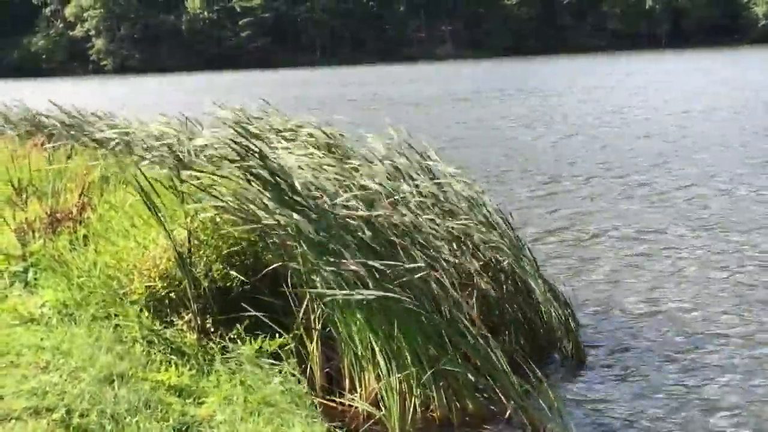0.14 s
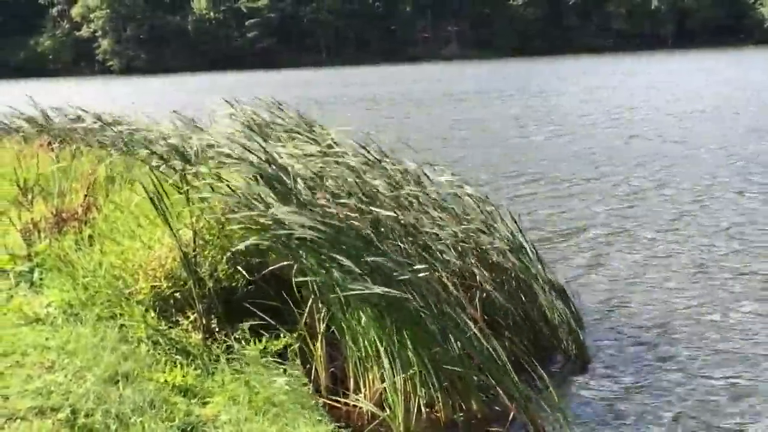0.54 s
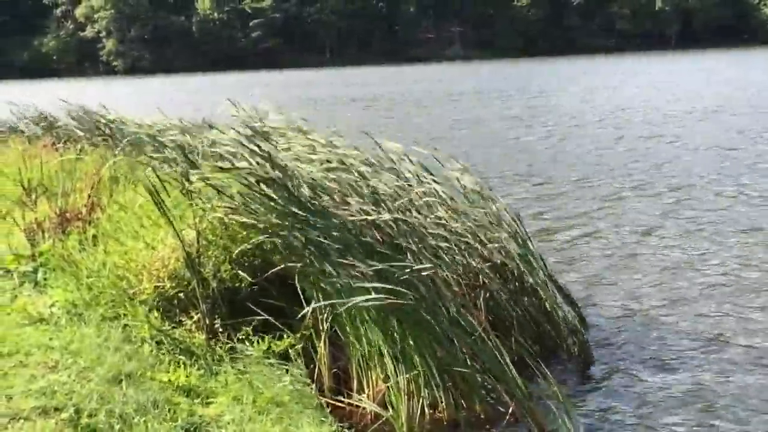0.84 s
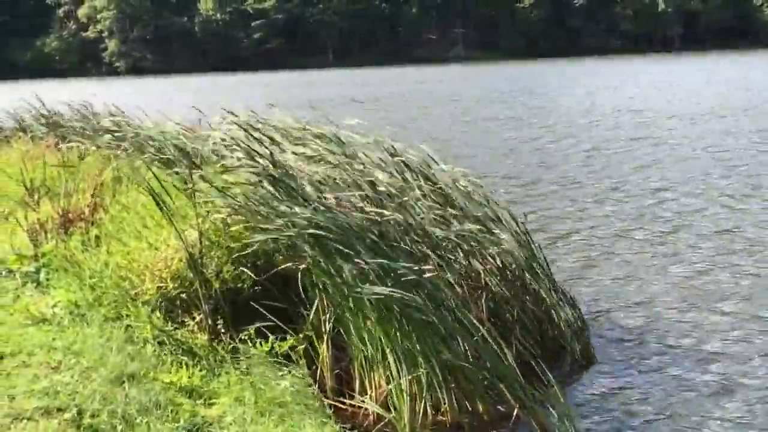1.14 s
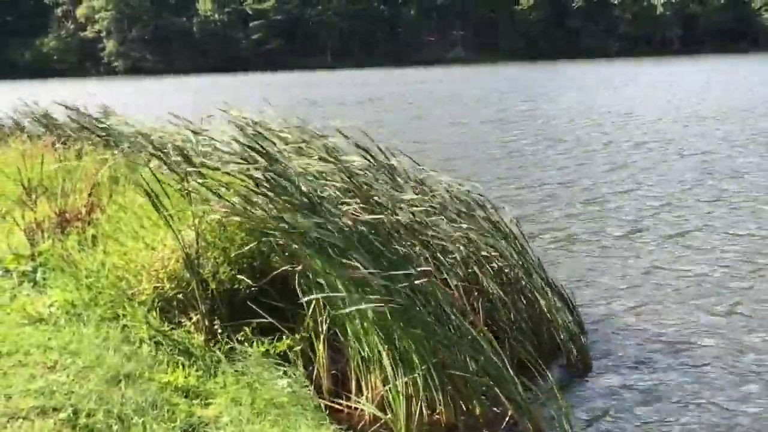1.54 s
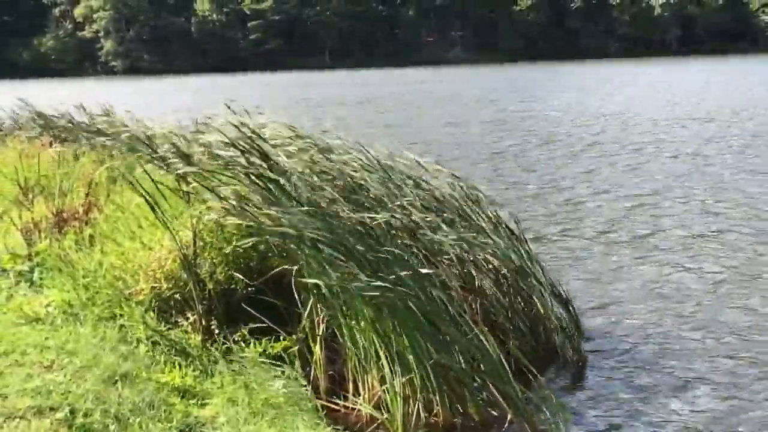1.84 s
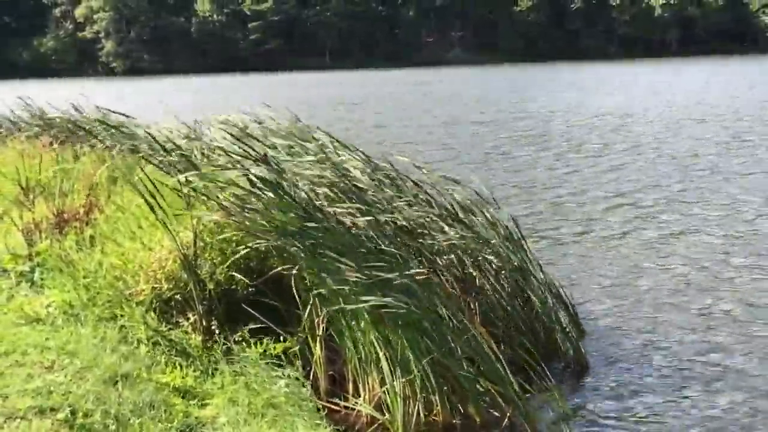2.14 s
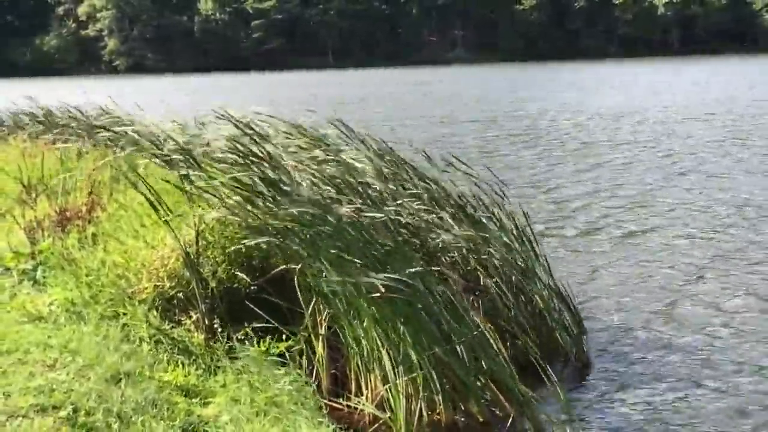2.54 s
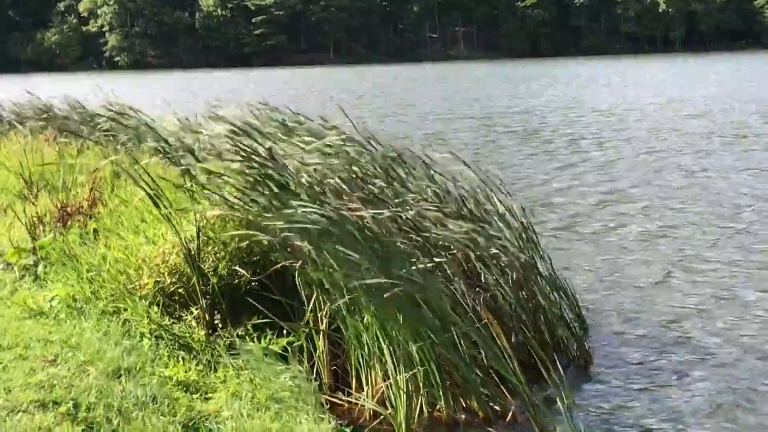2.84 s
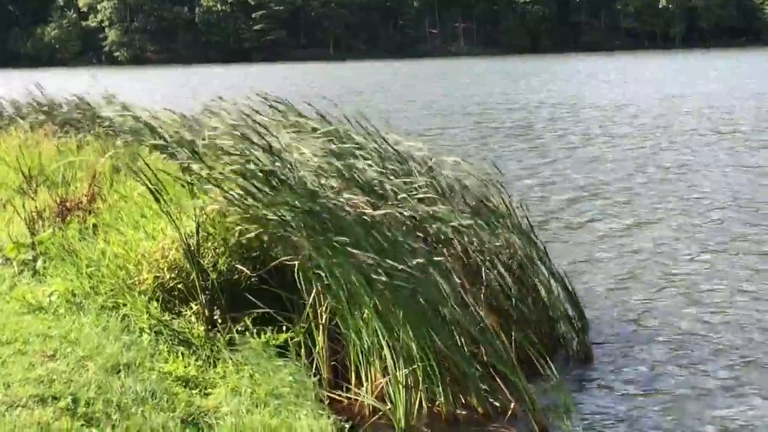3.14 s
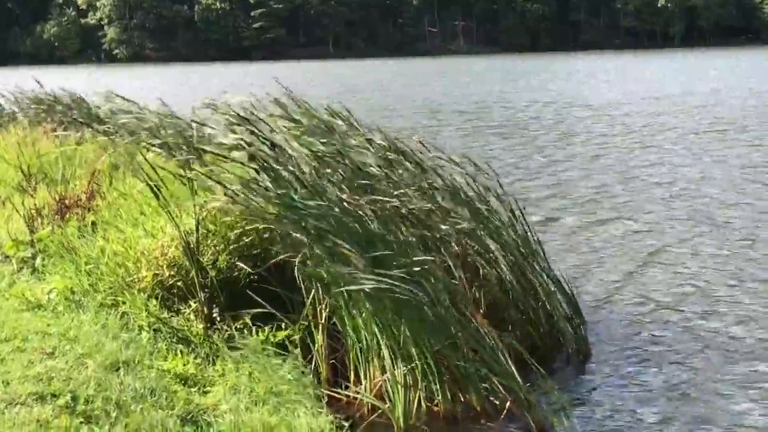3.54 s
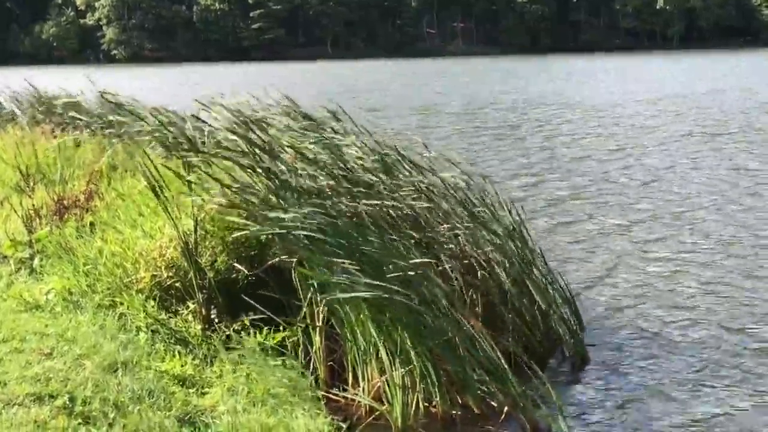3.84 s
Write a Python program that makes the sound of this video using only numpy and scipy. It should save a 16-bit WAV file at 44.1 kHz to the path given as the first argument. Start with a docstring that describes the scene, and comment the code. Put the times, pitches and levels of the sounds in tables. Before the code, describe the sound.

Wind blows softly through lakeside reeds, with low gusts bumping against the microphone.

```python
"""Wind in lakeside reeds.

Reeds and wavelets make an even wash, with the fine rustle of touching leaves and a few bubble plips.
Wind rumbles on the microphone, easing off, and single eddies bump against it.
An insect, probably a meadow katydid, rubs its wings in a very high buzz, stops, ticks, faintly resumes."""
import sys
import numpy as np
from scipy import signal
from scipy.fft import rfft, irfft
from scipy.io import wavfile
from scipy.ndimage import uniform_filter1d

SR = 44100
rng = np.random.default_rng(int(sys.argv[2]) if len(sys.argv) > 2 else 0)


def file_out(sig):
    """Save sig as 16-bit WAV at sys.argv[1]."""
    # one column per channel
    cols = np.atleast_2d(sig).T
    # limit, then scale
    lim = np.clip(cols, -1, 1)
    pcm = np.round(lim * 32767).astype(np.int16)
    wavfile.write(sys.argv[1], SR, pcm)


N = 176400


# reed and wavelet spectrum (frequency [Hz], density [dB])
WASH_SPECTRUM = [(100, -23), (350, -1.5), (600, 1.5), (1050, 0.5), (1600, -2.5), (2050, -6), (3300, -7.5),
                 (4550, -11), (4900, -15), (5300, -13), (6700, -15), (7700, -19.5), (8500, -17),
                 (9500, -17.5), (10500, -22.5), (12000, -20), (13500, -20.5), (16000, -23)]
WASH_DB, SWELL_DB, FLICKER_DB = -59, 0.43, 0.78

def wash(bands=12):
    """Reeds and wavelets: noise bands that swell together and flicker separately."""
    spectrum = rfft(colour(noise(), WASH_SPECTRUM))
    swell_db = SWELL_DB * walk(2.6)
    band_position = np.interp(np.log(freqs()), np.log([300, 15000]), [0, bands - 1])
    out = np.zeros(N)
    for k in range(bands):
        band = irfft(spectrum * np.maximum(1 - abs(band_position - k), 0), N)
        out += band * undb(swell_db + FLICKER_DB * walk(18))
    return undb(WASH_DB) * out


# leaf scratch spectrum (frequency [Hz], density [dB])
LEAF_SPECTRUM = [(700, -12), (1400, 1), (3500, -14), (6500, -9.5), (11000, -26), (16000, -22)]
LEAF_DB, TOUCHES_PER_S, LEAF_SPREAD_DB, LEAF_DECAY_S = -72.5, 400, 3, 0.0023

def leaves():
    """Blades brush each other: many tiny scratches of uneven size."""
    touches = rng.random(N) < TOUCHES_PER_S / SR
    sizes = undb(LEAF_SPREAD_DB * np.minimum(rng.exponential(size=N), 4))
    envelope = signal.lfilter([1], [1, -np.exp(-1 / (LEAF_DECAY_S * SR))], touches * sizes)
    return undb(LEAF_DB) * colour(envelope * noise(), LEAF_SPECTRUM)


# reed sway (time [s], gain [dB])
REED_SWAY = [(0, .5), (.35, 1.5), (.65, -1), (1.2, 0), (1.7, 0.54), (2.5, 0), (3.2, 0.5), (4, 1)]

def reeds():
    """Wash and rustle rise and fall as the reeds sway."""
    return (wash() + leaves()) * undb(curve(REED_SWAY))


# wind pressure on the microphone (time [s], level [dB])
WIND_LEVEL = [(0, -36), (.1, -36), (.28, -38), (.45, -34.5), (.55, -35.5), (.6, -39), (.66, -29.5),
              (.71, -39), (.9, -41), (1.04, -36.5), (1.13, -36), (1.2, -41), (1.28, -36.5), (1.42, -33),
              (1.48, -43.5), (1.55, -41), (1.64, -47.5), (1.73, -40), (1.85, -46), (2.03, -43), (2.11, -53),
              (2.22, -39.5), (2.32, -40), (2.4, -40), (2.49, -45), (2.56, -46.5), (2.72, -47),
              (2.86, -46.5), (3.03, -43), (3.11, -50), (3.2, -48.5), (3.38, -47.5), (3.54, -46),
              (3.63, -50.5), (3.76, -47.5), (3.9, -43.5), (3.97, -41.5)]
# air stream spectrum (frequency [Hz], density [dB])
RUMBLE_SPECTRUM = [(15, -31), (30, -5), (45, -2.5), (62, 2), (85, -3.5), (125, -10.5), (180, -16),
                   (260, -27), (400, -48), (800, -82), (2000, -85)]
# fine turbulence spectrum (frequency [Hz], density [dB])
FLUTTER_SPECTRUM = [(60, -30), (140, 5.5), (230, -0.5), (330, -7.5), (430, -15.5), (530, -17.5),
                    (720, -20.5), (1500, -57), (3000, -90)]
FLUTTER_DB, FLUTTER_DB_PER_DB, BRISK_WIND_DB = -49.5, 1.52, -34
RUMBLE_SPREAD_DB, FLUTTER_SPREAD_DB = 2.5, 5

def buffeting():
    """Air streams over the microphone: low rumble, plus patchy flutter that grows faster than the wind."""
    wind_db = curve(WIND_LEVEL)
    rumble = steady(colour(noise(), RUMBLE_SPECTRUM)) * undb(wind_db + RUMBLE_SPREAD_DB * walk(35))
    flutter = steady(colour(noise(), FLUTTER_SPECTRUM)) * undb(FLUTTER_SPREAD_DB * walk(60))
    flutter_db = FLUTTER_DB + FLUTTER_DB_PER_DB * (wind_db - BRISK_WIND_DB)
    return rumble + unit(flutter) * undb(flutter_db)


# eddy strikes (time [s], pulse peak [dB], pulse centre [Hz], wake [dB], wake top [Hz], wake sigma [s])
EDDY_STRIKES = [(.438, -27, 83.5, -36.5, 231, 0.0088), (0.512, -23, 78.5, -38, 230, 0.011),
                (.535, -27, 65, -45, 230, 0.012), (0.6325, -19.5, 433, -31.5, 620, 0.0047),
                (.6367, -15.5, 212, -23, 310, 0.0062), (0.644, -21.5, 104, -30, 330, 0.0073),
                (.661, -21, 69.6, -37.5, 280, 0.011), (0.75, -21, 73.6, -34, 200, 0.014),
                (.797, -22, 84, -37, 285, 0.012), (0.888, -23.5, 70, -35, 241, 0.013),
                (.915, -22.5, 99, -38.5, 296, 0.0052), (0.9326, -22, 264, -32.5, 486, 0.012),
                (0.979, -26, 105, -26.5, 258, .006), (1.001, -19, 60.6, -31, 293, 0.0088),
                (1.101, -26.5, 134, -38, 261, 0.013), (1.134, -28, 64.6, -37, 198, 0.0044),
                (1.216, -32.5, 220, -45, 350, 0.0085), (1.26, -20, 81, -38, 220, 0.014),
                (1.302, -21.5, 64, -37, 237, .012), (1.573, -25, 78, -41.5, 220, 0.014),
                (1.726, -33.5, 113, -44, 227, 0.013), (1.897, -17, 107, -32.5, 343, 0.011),
                (2.260, -19.5, 135, -60, 230, .005), (2.602, -27.5, 98, -46.5, 242, 0.0095),
                (2.748, -31, 126, -45, 320, 0.013), (2.781, -32, 122, -42.5, 290, 0.0072),
                (2.925, -42, 83.6, -52, 240, 0.0084), (3.313, -37.5, 90, -51, 317, 0.0074),
                (3.436, -38.5, 110, -50, 340, 0.0064), (3.826, -36.5, 200, -43.5, 430, 0.0055),
                (3.838, -28, 72, -45.5, 250, 0.0075), (3.857, -28, 85, -40.5, 620, 0.0063)]
WAKE_LOW_HZ, WAKE_LOWPASS_ORDER, WAKE_TILT = 105, 3.24, 0.63

def eddies(t):
    """Each eddy is one smooth swing of pressure inside a short turbulent wake."""
    out, f = np.zeros(N), freqs()
    highpass = 1 / np.hypot(1, (WAKE_LOW_HZ / f) ** 2)
    for at, peak_db, pulse_hz, wake_db, top_hz, sigma_s in EDDY_STRIKES:
        u = (np.pi * pulse_hz * (t - at)) ** 2
        pulse = (1 - 2 * u) * np.exp(-u)
        lowpass = 1 / np.hypot(1, (f / top_hz) ** WAKE_LOWPASS_ORDER)
        turbulence = irfft(rfft(noise()) * f ** -WAKE_TILT * highpass * lowpass, N)
        wake = steady(turbulence, samples=882) * bell(t - at, sigma_s)
        out += undb(peak_db) * pulse + undb(wake_db) * wake
    return out


# microphone port response (frequency [Hz], gain [dB])
PORT_RESPONSE = [(15, -26), (28, -12.5), (42, 0.5), (150, 0), (250, 1), (340, 0.5), (390, -0.5), (428, -5),
                 (470, -1.5), (535, -2.5), (640, -1), (730, -6), (900, -1), (1500, 1)]

def wind(t):
    """The microphone opening colours the buffeting and the eddies."""
    return irfft(rfft(buffeting() + eddies(t)) * gains(PORT_RESPONSE), N)


# wing strokes (time [s], rate [Hz])
WING_RATE = [(0, 36.5), (1, 36.5), (1.3, 36.1), (2.6, 36.1), (3.33, 34.2), (4, 35)]
# buzz envelope (time [s], level [dB])
BUZZ_LEVEL = [(0, -79), (.07, -77), (.12, -68), (.24, -73), (.34, -68), (.66, -74.5), (.97, -67.5),
              (1.3, -75), (1.53, -68), (1.66, -72), (1.88, -69), (2.04, -71), (2.13, -70), (2.4, -70),
              (2.85, -67), (3.1, -66.5), (3.32, -69), (3.36, -89.5), (3.8, -86), (3.9, -77), (4, -80)]
# wing resonances (frequency [Hz], density [dB])
WING_SPECTRUM = [(6000, -47), (9000, -22), (11300, -17), (12300, -4), (13700, -10), (14400, 4), (15300, 5),
                 (16000, -4.5)]
# lone strokes (time [s], envelope peak [dB])
WING_TICKS = [(3.380, -64), (3.494, -72), (3.552, -68)]
FIRST_STROKE_S, STROKE_SIGMA_CYCLES, JITTER_CYCLES = .018, .19, .04
STROKE_SKEW, RETURN_STROKE = 0.28, .22  # slower rise than fall; strength of the wing's way back
STROKE_SCATTER_DB, TICK_SIGMA_S = 1.3, .002

def katydid(t):
    """Each wing stroke drags a file over the scraper, swells and breaks off; lone strokes tick."""
    cycles = np.cumsum(curve(WING_RATE)) / SR - FIRST_STROKE_S * WING_RATE[0][1]
    phase = (cycles + JITTER_CYCLES * walk(25) + .5) % 1 - .5
    sigma = STROKE_SIGMA_CYCLES * (1 - STROKE_SKEW * np.sign(phase))
    strokes = unit(RETURN_STROKE + bell(phase, sigma))
    buzz = strokes * undb(curve(BUZZ_LEVEL) + STROKE_SCATTER_DB * walk(36.1))
    ticks = sum(undb(db) * bell(t - at, TICK_SIGMA_S) for at, db in WING_TICKS)
    return (buzz + ticks) * colour(noise(), WING_SPECTRUM)


# bubbles at the shore (time [s], starting pitch [Hz], peak [dB])
BUBBLES = [(.057, 1470, -52), (.320, 3150, -56), (.528, 1270, -54.5), (1.829, 1910, -55.5),
           (2.920, 1560, -53)]
PLIP_DECAY_S, PLIP_RISE_PER_S = .008, 5.3

def plips(t):
    """Small bubbles ring in breaking wavelets, rising in pitch as they fade."""
    out = np.zeros(N)
    for at, hz, db in BUBBLES:
        age = np.maximum(t - at, 0)
        cycles = hz * age * (1 + PLIP_RISE_PER_S * age / 2)
        out += undb(db) * np.exp(-age / PLIP_DECAY_S) * np.sin(2 * np.pi * cycles)
    return out


def undb(db):
    """Decibels to gain."""
    return 10 ** (np.asarray(db) / 20)


def unit(x):
    """Scale to rms 1."""
    return x / np.sqrt(np.mean(x ** 2))


def bell(x, sigma):
    """Bell curve, peak 1."""
    return np.exp(-.5 * (x / sigma) ** 2)


def curve(rows):
    """Straight lines through (time [s], value) rows."""
    return np.interp(np.arange(N) / SR, *np.array(rows, float).T)


def freqs():
    """Bin frequencies, floored at 1 Hz."""
    return np.maximum(np.arange(N // 2 + 1) * SR / N, 1)


def gains(points):
    """Gain per bin from (frequency [Hz], gain [dB]) points."""
    hz, db = np.array(points, float).T
    return undb(np.interp(np.log(freqs()), np.log(hz), db))


def colour(x, points):
    """Filter by (frequency [Hz], gain [dB]) points; rms 1."""
    return unit(irfft(rfft(x) * gains(points), N))


def noise():
    """White noise."""
    return rng.standard_normal(N)


def walk(rate_hz):
    """Random steps, smoothed twice; rms 1."""
    hold = int(SR / rate_hz)
    steps = np.repeat(noise()[:N // hold + 1], hold)
    return unit(uniform_filter1d(uniform_filter1d(steps, hold), hold)[:N])


def steady(x, samples=2646):
    """Even out the slow level of a noise."""
    power = uniform_filter1d(uniform_filter1d(x ** 2, samples), samples // 2)
    return x / np.sqrt(power)


def scene():
    """Reeds, wind, insect and bubbles at one microphone."""
    t = np.arange(N) / SR
    return (reeds() + wind(t) + katydid(t) + plips(t))[None]


CUTOFF_HZ = 15650

def record(dry):
    """The recorder cuts the top with a steep low-pass."""
    return signal.sosfilt(signal.ellip(10, .2, 70, CUTOFF_HZ, fs=SR, output="sos"), dry)


dry = scene()
out = record(dry)
file_out(out)
```